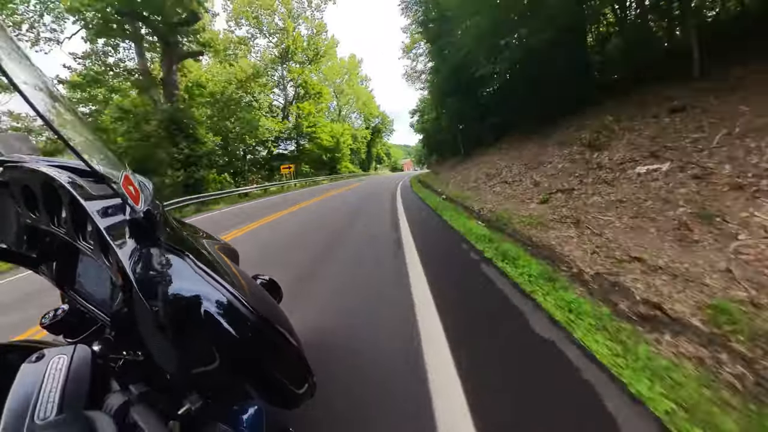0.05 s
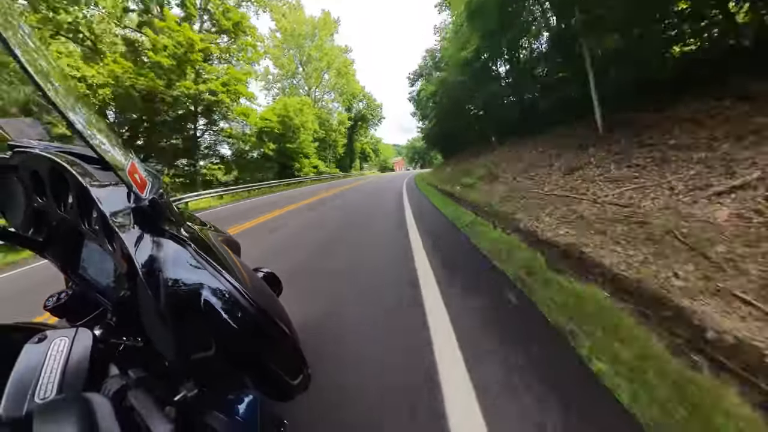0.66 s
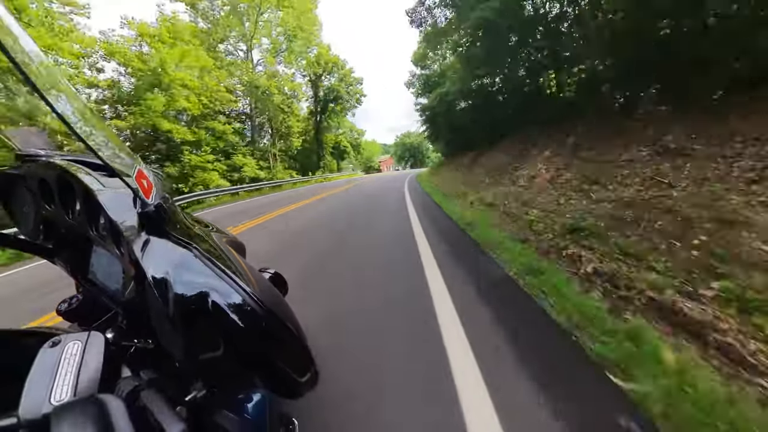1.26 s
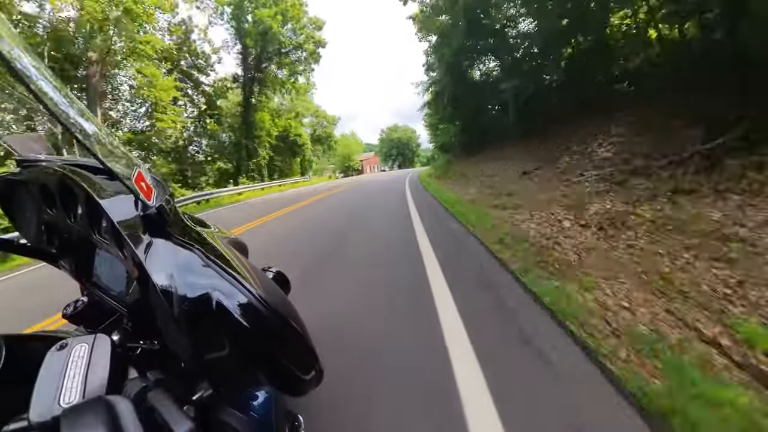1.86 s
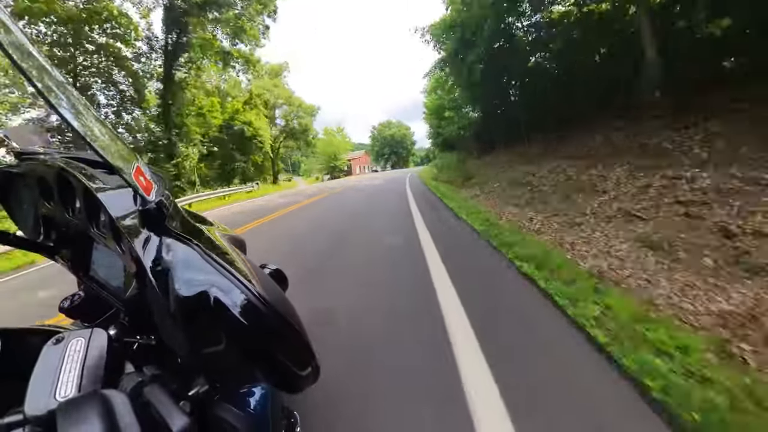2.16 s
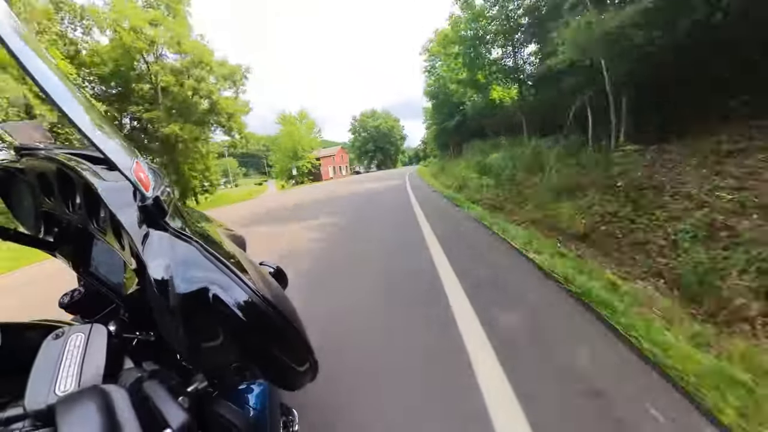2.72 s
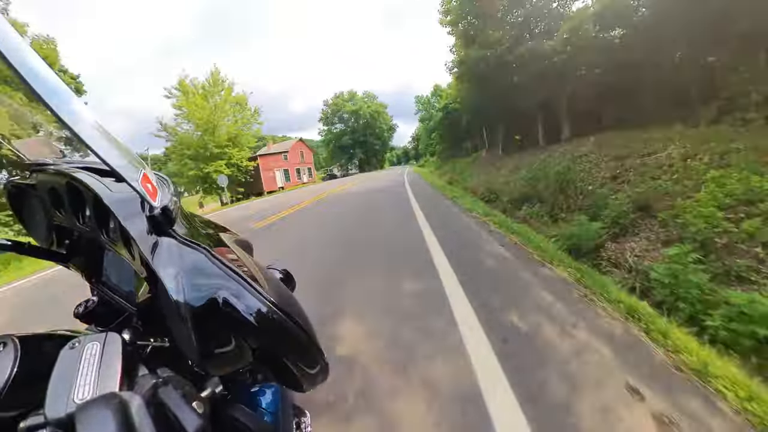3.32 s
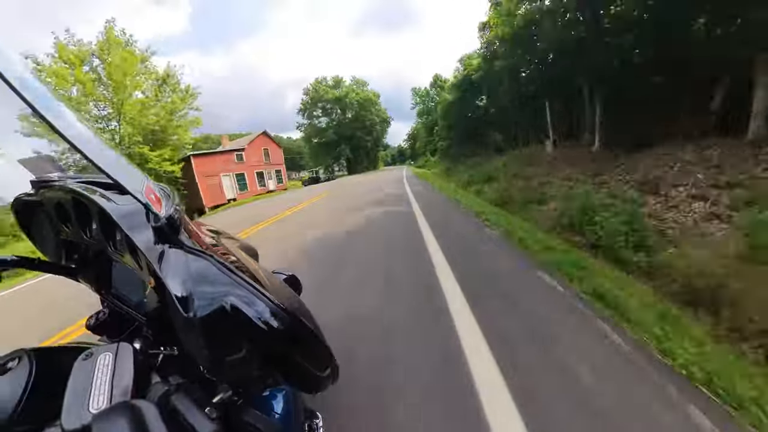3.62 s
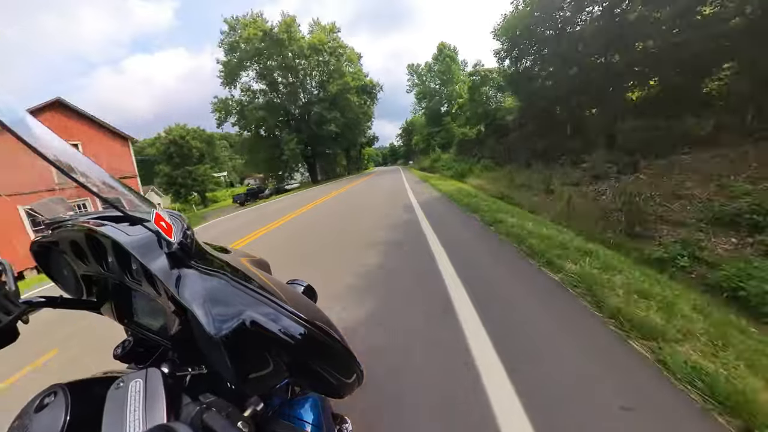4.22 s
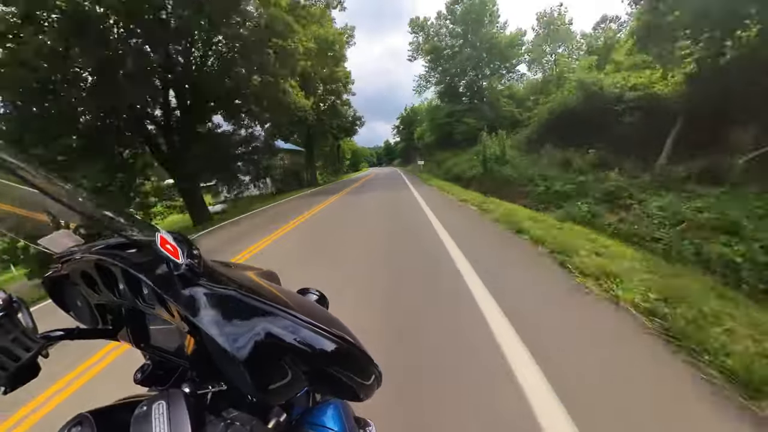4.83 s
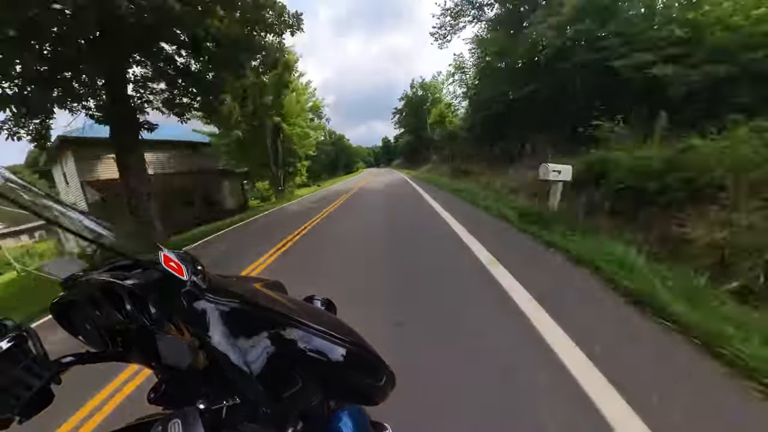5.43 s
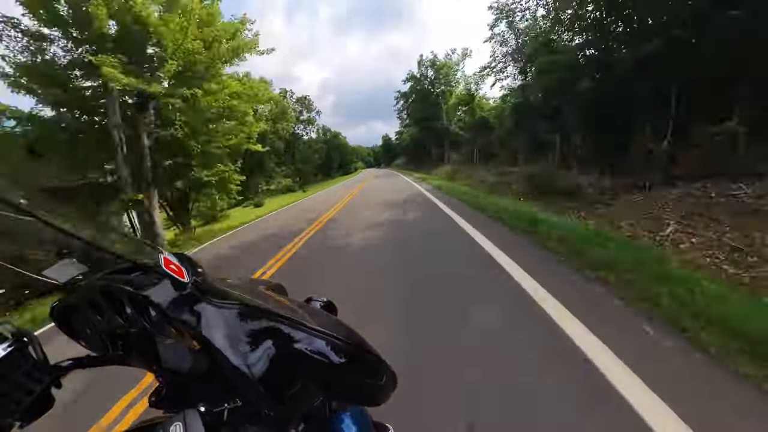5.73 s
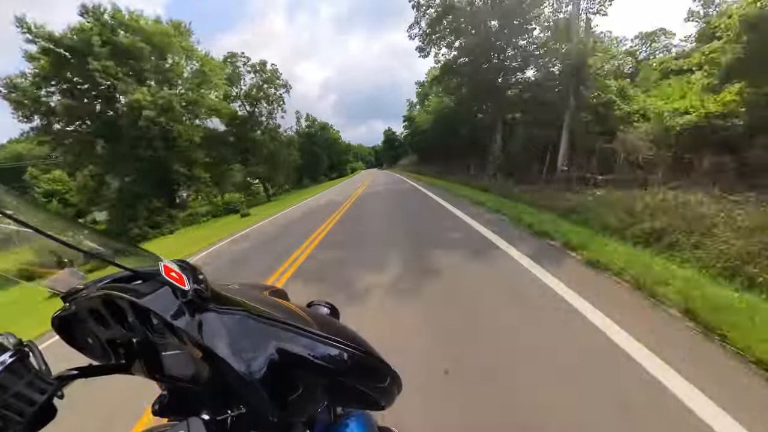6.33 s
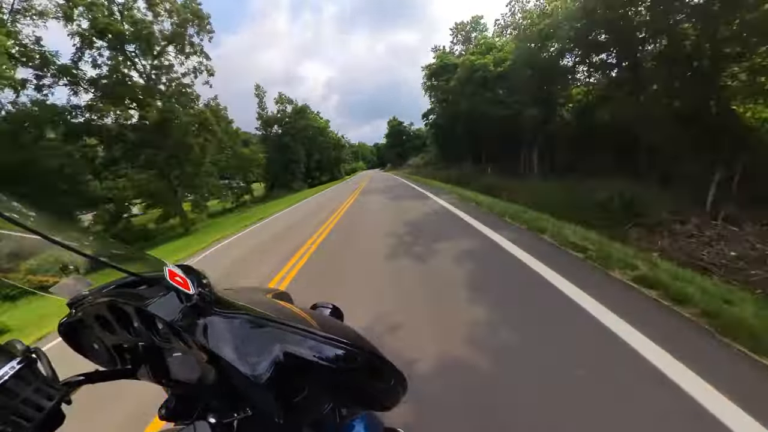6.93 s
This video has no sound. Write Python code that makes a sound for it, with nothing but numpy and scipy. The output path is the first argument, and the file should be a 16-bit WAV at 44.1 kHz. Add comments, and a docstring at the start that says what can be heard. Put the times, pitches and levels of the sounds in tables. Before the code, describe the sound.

A big twin-cylinder touring motorcycle idles with an uneven lope and a clunky rattle, louder on the left. The revs climb, flare briefly and drop as the clutch takes hold. The bike then cruises along a country road, its exhaust booming and rasping, with ticking valves and intake hiss. Midway the throttle opens a little, then eases. The microphone rides on the bike, with low tyre roar and light wind underneath.

```python
"""A big V-twin touring motorcycle lopes at idle, its drive case rattling; the sound starts louder on the
left. The revs climb, the clutch bites, the engine flares and takes the load, and the balance evens out.
It then cruises along a country road: two unevenly spaced exhaust pulses a cycle boom and rasp in the
pipes, the valve gear ticks and the intake hisses once a cycle. Midway the rider rolls the throttle on,
then eases it back. Tyres and a little wind lie underneath throughout; we ride along with the bike."""
import sys
import numpy as np
from scipy import signal
from scipy.fft import rfft, irfft, next_fast_len
from scipy.io import wavfile
from scipy.ndimage import uniform_filter1d, minimum_filter1d

SR = 44100
rng = np.random.default_rng(int(sys.argv[2]) if len(sys.argv) > 2 else 0)


def to_wav(s):
    """Save 16-bit WAV."""
    ch = np.atleast_2d(s).T  # columns
    pcm = np.round(np.clip(ch, -1, 1) * 32767)  # PCM
    wavfile.write(sys.argv[1], SR, pcm.astype(np.int16))


N = 316197
TIME = np.arange(N) / SR

# The revs. Each row: time in seconds, crank speed in rpm.
CRANK_SPEED = [(0.0, 1000), (0.33, 1053), (0.5, 1345), (0.68, 1547), (1.0, 1773), (1.27, 2394),
               (1.39, 2551), (1.63, 2206), (1.83, 2138), (2.29, 2257), (2.61, 2190), (3.0, 2258),
               (3.25, 2219), (3.75, 2257), (4.15, 2425), (4.95, 2421), (5.13, 2474), (5.3, 2401),
               (6.69, 2483), (7.17, 2502)]
# The putter while the clutch slips. Each row: multiple of the engine cycle, then dB at each PUTTER_RPM.
PUTTER_OVERTONES = [(3, -55, -50, -32.5, -26), (4, -48, -40, -22, -15), (5, -37, -16.5, -12.5, -12.5),
                    (6, -45, -41, -34, -34), (7, -18.5, -14.5, -18, -22.5), (8, -32, -32, -21.5, -33),
                    (9, -26, -28, -39, -35), (10, -28.5, -32, -27, -23.5), (11, -22, -26.5, -25.5, -42),
                    (12, -26.5, -21.5, -32.5, -29), (13, -32, -41, -23, -39), (14, -27, -37, -27.5, -40),
                    (15, -38, -23, -28.5, -46), (17, -25.5, -24, -31.5, -57),
                    (19, -35.5, -31, -35.5, -56.5), (22, -30.5, -40, -54, -43), (27, -31, -50, -42, -50)]
# The chug under load. Each row: multiple of the engine cycle, then dB at each CHUG_RPM.
CHUG_OVERTONES = [(2, -46.5, -39), (3, -28.5, -27.5), (4, -16, -15), (5, -11.5, -10.5), (6, -25.5, -25),
                  (7, -20, -19.5), (8, -38, -41), (9, -24, -23.5), (10, -35, -35), (11, -37, -28.5),
                  (12, -25.5, -26), (13, -32, -31), (14, -27.5, -33.5), (15, -37, -48), (16, -31.5, -42),
                  (17, -50, -51.5), (18, -48.5, -42), (19, -45.5, -40), (21, -42.5, -39), (22, -47, -54.5),
                  (23, -47, -46), (24, -38.5, -44.5), (25, -50.5, -50), (26, -51.5, -43), (27, -47, -54),
                  (28, -48.5, -46.5), (30, -45, -47.5), (32, -57.5, -51.5), (34, -53, -49.5)]
# Soft puffs from the pistons, fading under load. Each row: phase in cycles, relative strength.
PISTON_PUFFS = [(0.01, 0.74), (0.155, 0.55), (0.315, 0.97), (0.57, 1), (0.752, 0.42)]
# Resonances of the exhaust pipes, cylinder heads and drive case.
# Each row: pitch in Hz, width in Hz, relative level in dB.
PIPE_MODES = [(56.4, 19, -4), (107, 33, -1), (156, 16, -0.5), (228, 89, -8), (347, 11, -14)]
HEAD_MODES = [(2063, 66, 2.5), (2223, 95, 7), (3465, 64, -0.5), (3850, 28, 2.5), (4345, 69, -1.5),
              (5150, 90, -5), (5550, 110, -8)]
CASE_MODES = [(459.5, 17, 8.5), (560, 170, -5), (770, 22, -2), (1115, 33, -8), (1920, 84, -17),
              (3180, 650, -24)]
# Valves seating. Each row: phase in cycles, relative strength.
VALVE_SEATS = [(0.02, 0.44), (0.23, 0.6), (0.45, 0.65), (.7, .3), (0.81, 0.81), (.91, 0.77)]
# Valve gear faders. Each row: time in seconds, heads in dB, bright ring in dB.
VALVE_FADERS = [(0.2, -68, -49), (1.0, -53, -49), (1.55, -60, -53), (2.5, -49, -52), (3.4, -50, -51.5),
                (4.5, -48, -51.5), (5.3, -48, -53), (7.1, -50, -51.5)]
# Two narrow bands of high sizzle. Each row: centre in Hz, width in Hz.
SIZZLE_BANDS = [(6620, 320), (7760, 420)]
# Their swells and fades. Each row: time in seconds, lower band in dB, upper band in dB.
SIZZLE_FADERS = [(0.2, -64, -68), (0.9, -75, -67), (1.5, -81, -70), (3.2, -72, -67.5), (3.6, -62, -62.5),
                 (5.0, -61.5, -67.5), (5.5, -70.5, -67.5), (7.1, -68.5, -67.5)]
# Chatter in the drive case. Each row: time in seconds, level in dB.
RATTLE_FADER = [(0, -27), (.34, -28.5), (.45, -34.5), (.6, -30), (.69, -35.5), (1.2, -38), (1.7, -73)]
# Single clunks in the drive case. Each row: start in seconds, peak level in dB.
CASE_CLUNKS = [(0.056, -17), (.168, -18), (.325, -13.5), (2.962, -22.5), (5.404, -22), (6.415, -24)]
# Tone of the exhaust rasp, intake hiss, tyre roar, wind buffet and rushing air.
# Each row: frequency in Hz, relative level in dB.
RASP_EQ = [(250, -3.5), (320, -8), (370, -2.5), (430, -4.5), (520, -5), (620, -5.5), (730, -7),
           (830, -12.5), (1050, -14), (1500, -23.5), (2500, -31), (5000, -77)]
INTAKE_EQ = [(500, 8), (1100, 7), (1700, -1), (2550, -6), (3400, -4.5), (4800, -11), (5600, -10),
             (6400, -18), (7400, -21), (8200, -25), (9200, -28.5), (11000, -64.5)]
TYRE_EQ = [(60, -28.5), (200, 21), (400, 6), (1000, -10.5), (2000, -29.5), (4000, -18), (9000, -40.5)]
BUFFET_EQ = [(12, -23), (30, -12), (55, 4), (100, -14.5), (200, -2), (500, -44), (2000, -64.5)]
AIR_EQ = [(300, -5), (1500, -37), (2800, 11), (3800, 13), (5500, 5.5), (8000, -15.5), (10500, -42)]
# Left-right balance. Each row: time in seconds, left minus right in dB.
BALANCE = [(0.05, 21), (0.19, 21.5), (1.05, 14.5), (1.19, 9), (3.88, 2), (5.13, 1.5), (5.31, 4.0),
           (7.1, 5.0)]

PUTTER_RPM, CHUG_RPM, CRUISE_RPM = (1020, 1330, 1650, 2350), (2220, 2430), 2400
START_PHASE, FIRING_PHASE, FIRING_GAP = 0.28, 0.116, 315 / 720  # in engine cycles
CLUTCH_BITES_S, SETTLE_S, IDLE_LOPE, LOADED_LOPE = 0.65, 0.17, 0.95, 0.14
LOAD_FROM_S, LOAD_RISE_S = 1.406, 0.27  # the clutch closes fully
FLARE_S, FLARE_WIDTH_S, FLARE_BARK_DB = 1.357, 0.17, -2.5  # revs flare with little load: the bark drops
ROLL_ON_S, ROLL_RISE_S, ROLL_HOLD_S, ROLL_FALL_S = 3.64, 0.55, 0.97, 0.97
SWING_ORDER, SWING_Q, SWING_GAIN = 4.13, 3.6, 45  # after a blow the gas swings about four times a cycle
SHELL_ORDER, SHELL_PHASE = 16, 0.28  # higher multiples come from the muffler shells, later in the cycle
NOTE_WOBBLE_DB, SHELL_WOBBLE_DB, ROLL_ON_BITE_DB = 0.62, 3, 2.5
TYRES_DB, BUFFET_DB, AIR_DB = -33.5, -36, -56
# Each part: base dB at cruise speed, then dB added per doubling of speed, by full lope, by the roll-on.
BOOM_DB, RASP_DB, INTAKE_DB = (-41.5, -1.5, 12.5, -2.5), (-34.5, 4, 8, -0.5), (-39, 3, 6.5, 0.5)


def exhaust_note(cycle, rpm, lope, throttle):
    """Locked to the crank: a soft putter while the clutch slips, two hard blows a cycle under load."""
    slip = np.interp(TIME, [LOAD_FROM_S, LOAD_FROM_S + LOAD_RISE_S], [1, 0])
    note = 0
    for k in [round(row[0]) for row in CHUG_OVERTONES]:
        blows = loaded_blows(k)
        puffs = sum(strength * np.exp(-2j * np.pi * k * phase) for phase, strength in PISTON_PUFFS)
        putter_db = overtone_db(PUTTER_OVERTONES, PUTTER_RPM, k, rpm)
        chug_db = overtone_db(CHUG_OVERTONES, CHUG_RPM, k, rpm)
        bite_db = ROLL_ON_BITE_DB * throttle * (8 < k < 26)  # the roll-on hardens the mids
        if k > SHELL_ORDER:
            wobble_db = SHELL_WOBBLE_DB * drift(4.5)
        else:
            wobble_db = NOTE_WOBBLE_DB * (1 + 0.86 * lope) * drift(14)
        gain = from_db(slip * putter_db + (1 - slip) * chug_db + bite_db + wobble_db)
        angle = np.angle(blows) + slip * np.angle(puffs / blows)
        note += gain * np.cos(2 * np.pi * k * cycle + angle)
    return note


def loaded_blows(k):
    """Overtone k of two sharp blows: low ones swing the gas, high ones come from the muffler shells."""
    both = 1 + np.exp(-2j * np.pi * k * FIRING_GAP)
    if k > SHELL_ORDER:
        return both * np.exp(-2j * np.pi * k * SHELL_PHASE)
    swing = 1 + SWING_GAIN / (1 + 1j * SWING_Q * (k / SWING_ORDER - SWING_ORDER / k))
    smear = 0.0019 * (k - SWING_ORDER) ** 2  # the blows spread out in the pipes
    return both * swing * np.exp(-2j * np.pi * k * FIRING_PHASE - 1j * smear)


def overtone_db(table, speeds, k, rpm):
    """The level of overtone k, blended between speeds; unlisted ones barely sound."""
    rows = {round(multiple): levels for multiple, *levels in table}
    return np.interp(rpm, speeds, rows[k]) if k in rows else -53.5


def firings(cycle, lope):
    """The cylinders fire 315 and 405 degrees apart; without load they stumble and piston puffs show."""
    spread_db, jitter_s = 0.23 + 1.4 * lope, 0.00005 + 0.00089 * lope
    first, second = (strokes(cycle, FIRING_PHASE + gap, spread_db, jitter_s) for gap in (0, FIRING_GAP))
    puffs = sum(strength * strokes(cycle, phase, spread_db, jitter_s) for phase, strength in PISTON_PUFFS)
    return first + from_db(-0.7) * second + lope * puffs


def pipe_boom(pulses):
    """Uneven puffs ring the pipes; the mufflers pass only the lowest resonances."""
    boom = sum((-1) ** (k + 1) * resonate(pulses * from_db(db), hz, width)
               for k, (hz, width, db) in enumerate(PIPE_MODES))
    boom = cut(boom, hz=43, kind="high", order=4)
    return evened(cut(boom, hz=307, kind="low", order=4))


def pipe_rasp(cycle, pulses, lope):
    """Each pulse's edge scatters along its own pipe, alike at every firing, and drags turbulence along."""
    age = TIME[:SR // 6]
    pipes = rng.standard_normal((2, len(age))) * age * np.exp(-age / 0.0074)
    front = (cycle - FIRING_PHASE + FIRING_GAP / 2) % 1 < FIRING_GAP  # the front cylinder's turn
    scattered = sum(signal.fftconvolve(pulses * turn, pipe)[:N]
                    for turn, pipe in zip((front, ~front), pipes))
    surge = 1 + 0.7 * sum(gate(cycle, 0.28 + gap, sharpness=12) for gap in (0, FIRING_GAP))
    turbulence = coloured(surge * rng.standard_normal(N), RASP_EQ)
    return evened((0.84 + 2.7 * lope) * turbulence + evened(coloured(scattered, RASP_EQ)))


def drive_case():
    """Slack gears and chain chatter in their case until the load takes up the play; at times they clunk."""
    def ringing(x):
        muffled = cut(x, hz=3200, kind="low", order=4)
        return sum(from_db(db) * resonate(muffled, hz, width) for hz, width, db in CASE_MODES)
    chatter = evened(ringing(rng.standard_normal(N) * from_db(3 * drift(40))))
    hits = np.zeros(N)
    for start, db in CASE_CLUNKS:
        hits[int(start * SR)] = from_db(db)
    clunks = ringing(hits)
    return from_db(curves(RATTLE_FADER)[0]) * chatter + clunks * hits.max() / np.abs(clunks).max()


def intake(cycle, lope):
    """Air is gulped once a cycle in a grainy hiss; a nearly closed throttle smooths the gulps."""
    gulp = 0.53 * (1 - 0.16 * lope) * gate(cycle, 1.0, sharpness=4.5) * from_db(2 * drift(24))
    grain = from_db(1.5 * drift(250))
    return coloured(rng.standard_normal(N) * (1 + gulp) * grain, INTAKE_EQ)


def valve_ticks(cycle):
    """Valves open and seat with sharp ticks."""
    return rms_one(sum(strength * strokes(cycle, phase, spread_db=2, jitter_s=0.0005)
                       for phase, strength in VALVE_SEATS))


def valve_gear(cycle, ticks):
    """The ticks ring the cylinder heads; rubbing rockers keep a bright ring going."""
    heads_db, ring_db = curves(VALVE_FADERS)
    rubbing = 0.24 + gate(cycle, 0.94, sharpness=5.8)
    heads = 0
    for hz, width, db in HEAD_MODES:  # each mode flickers and wanders on its own
        knocks = ticks * from_db(3 * drift(40))
        knocks += from_db(-6.5) * rms_one(rng.standard_normal(N) * rubbing)
        heads += from_db(db + 2.5 * drift(2.7)) * resonate(resonate(knocks, hz, width), hz, 8 * width)
    friction = rng.standard_normal(N) * (2 + gate(cycle, 0.87, sharpness=4))
    ring = rms_one(resonate(friction, hz=2980, width=96))
    return from_db(heads_db) * evened(heads) + from_db(ring_db + 0.85 * drift(5)) * ring


def high_sizzle(ticks):
    """Two narrow bands of high sizzle swell and fade."""
    ticking_hiss = ticks + from_db(0.5) * rng.standard_normal(N)
    return sum(from_db(db) * evened(resonate(resonate(ticking_hiss, hz, width), hz, 2 * width))
               for (hz, width), db in zip(SIZZLE_BANDS, curves(SIZZLE_FADERS)))


def tyres():
    """Rubber rolling on the road lays down a steady, low roar."""
    return from_db(TYRES_DB) * coloured(rng.standard_normal(N), TYRE_EQ)


def wind():
    """Lumpy buffeting and a thin rush of air, different on each side."""
    buffet = from_db(BUFFET_DB + 1.4 * drift(1.6)) * coloured(rng.standard_normal((2, N)), BUFFET_EQ)
    return buffet + from_db(AIR_DB) * coloured(rng.standard_normal((2, N)), AIR_EQ)


def loping():
    """The engine's unevenness, 0-1: high at idle, settling once the clutch bites."""
    slack = np.exp(-np.maximum(TIME - CLUTCH_BITES_S, 0) / SETTLE_S)
    return LOADED_LOPE + (IDLE_LOPE - LOADED_LOPE) * slack


def roll_on():
    """Extra throttle, 0-1: rise, hold, fall."""
    return np.interp(TIME, np.cumsum([ROLL_ON_S, ROLL_RISE_S, ROLL_HOLD_S, ROLL_FALL_S]), [0, 1, 1, 0])


def loudness(law, rpm, lope, throttle):
    """The gain of one engine part from speed, lope and throttle."""
    base_db, doubling_db, lope_db, throttle_db = law
    doublings = np.log2(rpm / CRUISE_RPM)
    return from_db(base_db + doubling_db * doublings + lope_db * lope + throttle_db * throttle)


def balanced(x, balance_db):
    """Shares a sound between left and right; the left side is leaner in the bass."""
    ratio = from_db(balance_db)
    return 2 * np.array([ratio * cut(x, hz=72, kind="high", order=1), x]) / (1 + ratio)


def strokes(cycle, phase, spread_db, jitter_s):
    """One click per engine cycle at a given phase, each a little different in strength and timing."""
    at = np.searchsorted(cycle, np.arange(200) + phase % 1)
    inside = (at > 0) & (at < N)
    timing, strength = 1.5 * np.tanh(rng.standard_normal((len(at), 2)))[inside].T
    at = at[inside]
    late = (timing * np.broadcast_to(jitter_s, N)[at] * SR).astype(int)
    clicks = np.zeros(N)
    clicks[np.clip(at + late, 0, N - 1)] = from_db(strength * np.broadcast_to(spread_db, N)[at])
    return clicks


def gate(cycle, phase, sharpness):
    """Opens smoothly once per engine cycle."""
    return np.exp(sharpness * (np.cos(2 * np.pi * (cycle - phase)) - 1))


def drift(rate_hz):
    """A bounded random wander with a spread near 1."""
    return 1.7 * np.tanh(np.interp(TIME * rate_hz, np.arange(4000), rng.standard_normal(4000)))


def curves(rows):
    """A table's columns as automation curves, sample by sample."""
    seconds, *columns = np.transpose(rows)
    return [np.interp(TIME, seconds, column) for column in columns]


def resonate(x, hz, width):
    """A resonance with gain 1 at its peak."""
    r = np.exp(-np.pi * width / SR)
    poles = [1, -2 * r * np.cos(2 * np.pi * hz / SR), r * r]
    return signal.lfilter([(1 - r * r) / 2, 0, (r * r - 1) / 2], poles, x + 1e-18)


def coloured(x, eq):
    """Shapes x with an EQ curve and sets its rms to 1."""
    size = next_fast_len(N + SR // 10)
    hz, db = np.transpose(eq)
    bins_hz = np.arange(size // 2 + 1) * SR / size
    gain = from_db(np.interp(np.log(bins_hz + 1), np.log(hz), db))
    return rms_one(irfft(rfft(x, size) * gain, size)[..., :N])


def cut(x, hz, kind, order):
    return signal.sosfilt(signal.butter(order, hz, kind, fs=SR, output="sos"), x)


def evened(x):
    """Holds the rms at 1 over a few engine cycles."""
    size = SR // 4
    return x / np.sqrt(uniform_filter1d(uniform_filter1d(x ** 2, size), size) + 1e-20)


def rms_one(x):
    return x / np.sqrt(np.mean(x ** 2) + 1e-20)


def from_db(db):
    return 10 ** (np.asarray(db) / 20)


def scene():
    """One four-stroke cycle takes two turns of the crank and times the exhaust, valves and intake."""
    rpm, lope, throttle = curves(CRANK_SPEED)[0], loping(), roll_on()
    cycle = START_PHASE + np.cumsum(rpm) / (120 * SR)
    flare = np.exp(-((TIME - FLARE_S) / FLARE_WIDTH_S) ** 2)
    boom_gain, rasp_gain, intake_gain = (loudness(law, rpm, lope, throttle)
                                         for law in (BOOM_DB, RASP_DB, INTAKE_DB))
    pulses = firings(cycle, lope)
    boom = exhaust_note(cycle, rpm, lope, throttle) + boom_gain * pipe_boom(pulses)
    bark = from_db(FLARE_BARK_DB * flare) * rasp_gain * pipe_rasp(cycle, pulses, lope)
    rattle = drive_case()
    ticks = valve_ticks(cycle)
    treble = valve_gear(cycle, ticks) + high_sizzle(ticks)
    mix = boom + bark + rattle + treble + tyres() + intake_gain * intake(cycle, lope)
    return balanced(mix, curves(BALANCE)[0]) + wind()


def record(dry):
    """A fast limiter holds down the highest peaks; a steep low-pass takes off the top."""
    ceiling_db, stopband_hz, size = -4, 12100, SR // 100
    gain = np.minimum(from_db(ceiling_db) / (np.abs(dry).max(axis=0) + 1e-9), 1)
    held = minimum_filter1d(gain, size)
    limited = dry * uniform_filter1d(uniform_filter1d(held, size // 2), size // 2)
    return signal.sosfilt(signal.cheby2(12, 60, stopband_hz, fs=SR, output="sos"), limited)


dry = scene()
out = record(dry)
to_wav(out)
```